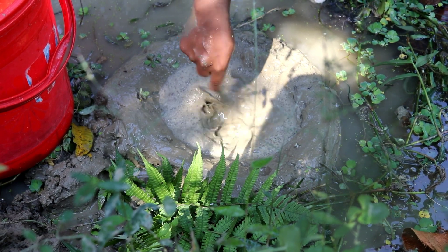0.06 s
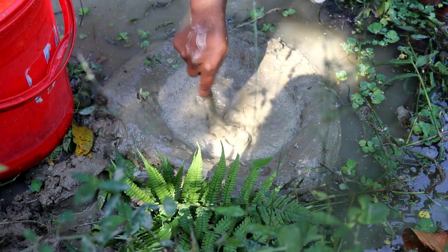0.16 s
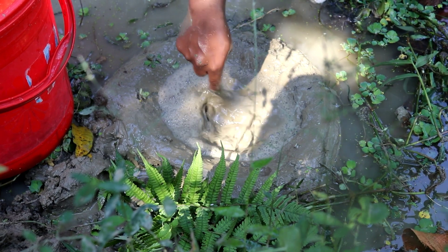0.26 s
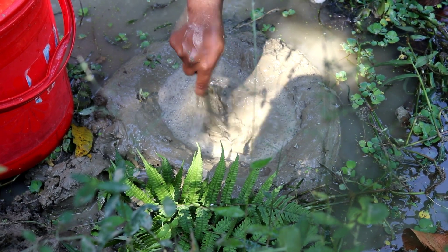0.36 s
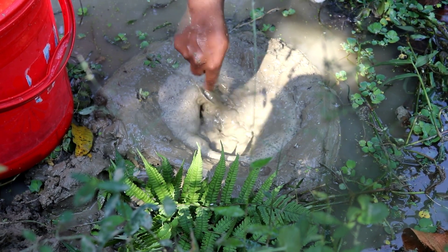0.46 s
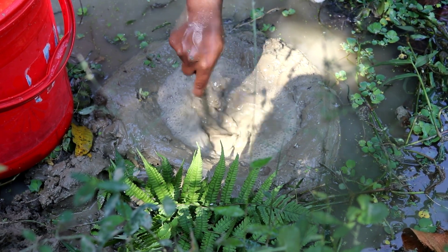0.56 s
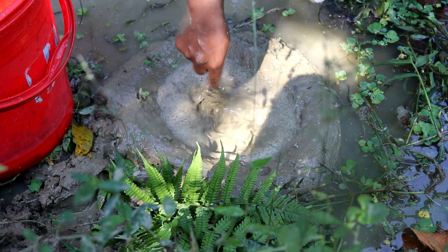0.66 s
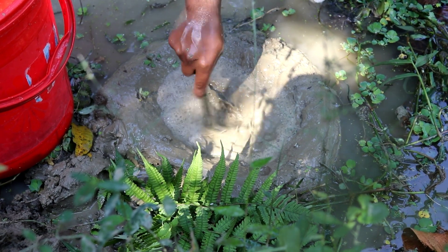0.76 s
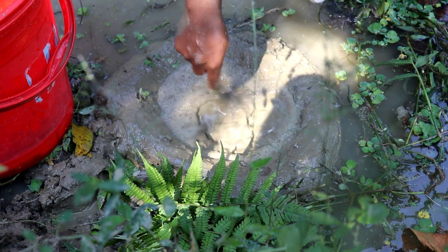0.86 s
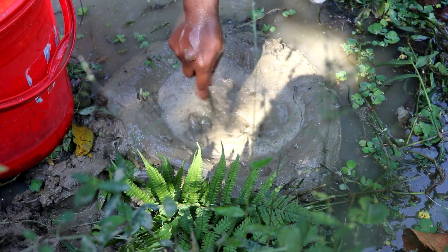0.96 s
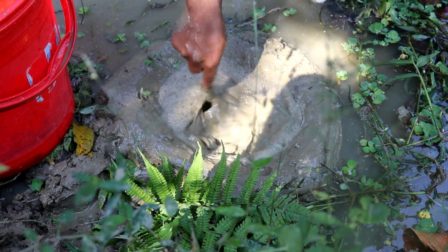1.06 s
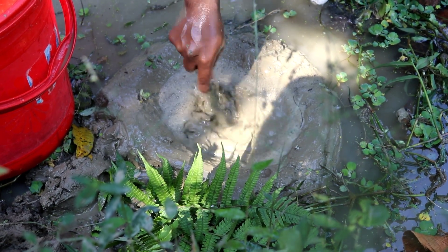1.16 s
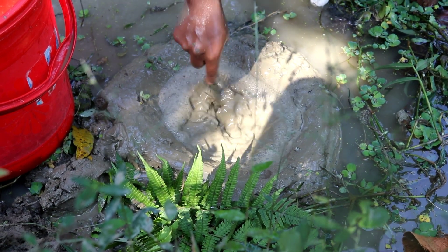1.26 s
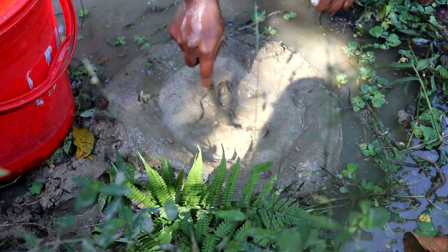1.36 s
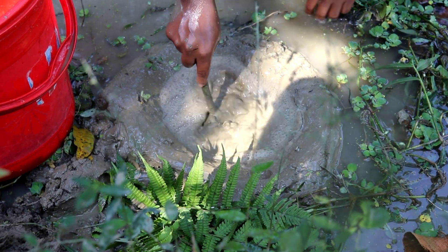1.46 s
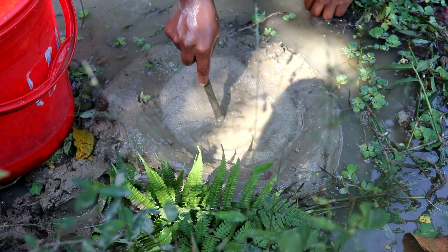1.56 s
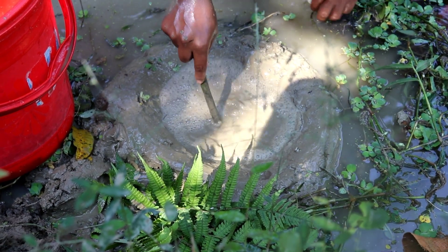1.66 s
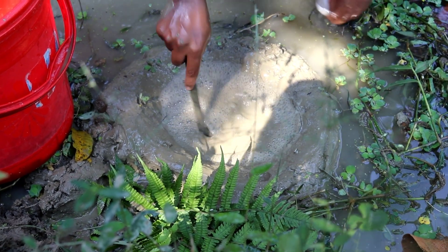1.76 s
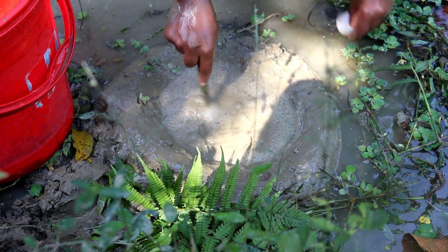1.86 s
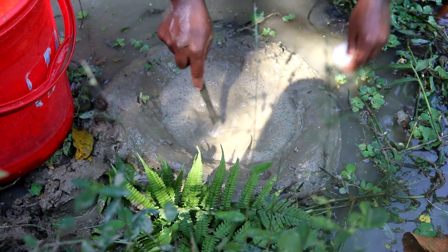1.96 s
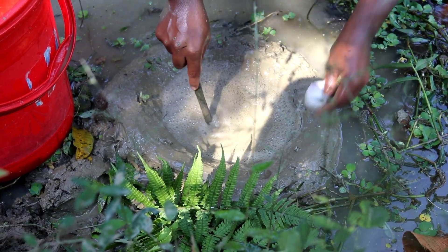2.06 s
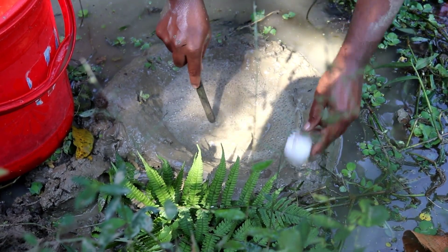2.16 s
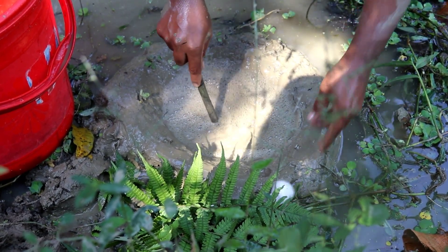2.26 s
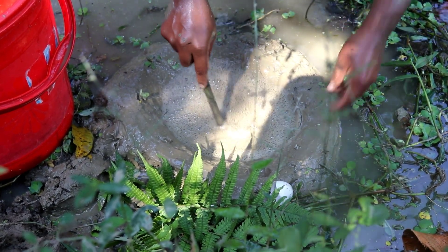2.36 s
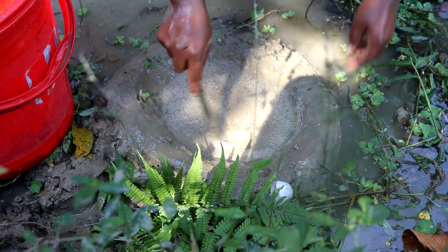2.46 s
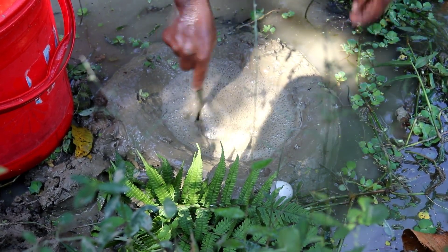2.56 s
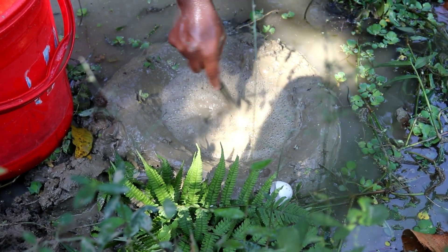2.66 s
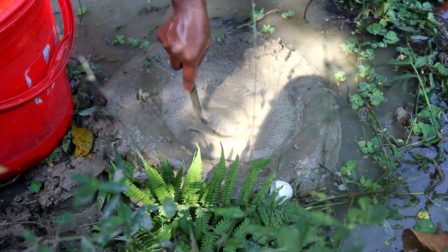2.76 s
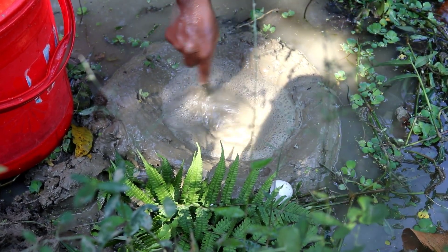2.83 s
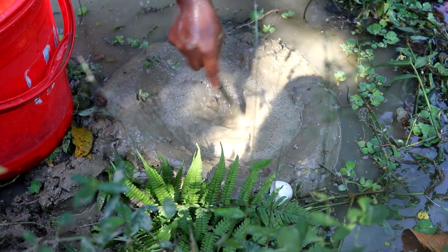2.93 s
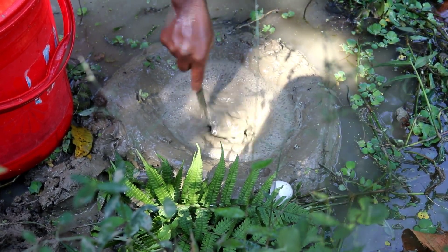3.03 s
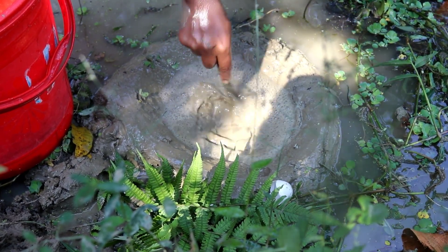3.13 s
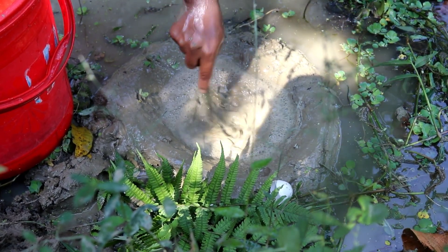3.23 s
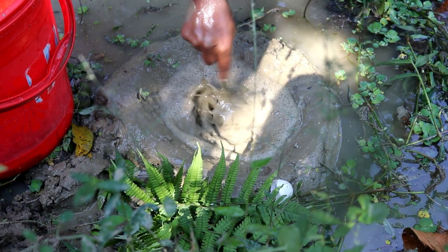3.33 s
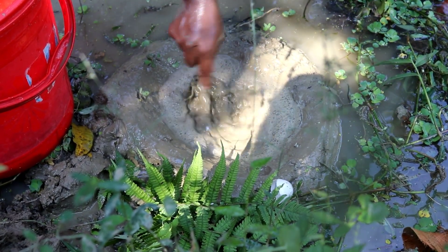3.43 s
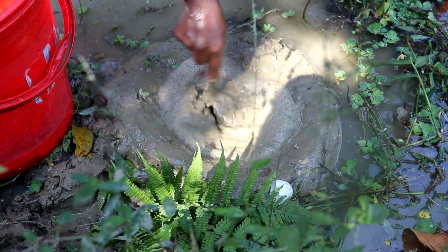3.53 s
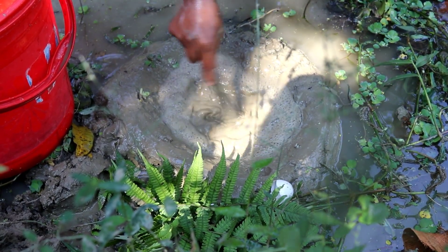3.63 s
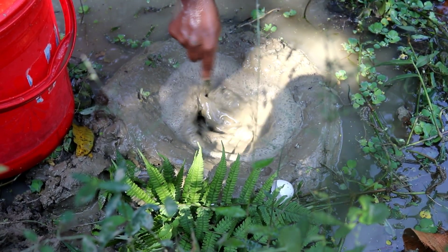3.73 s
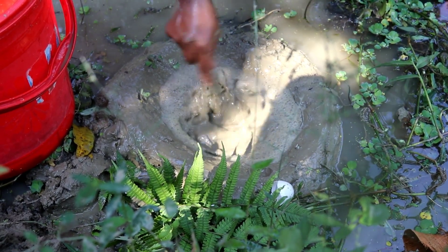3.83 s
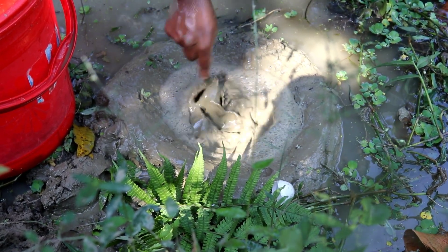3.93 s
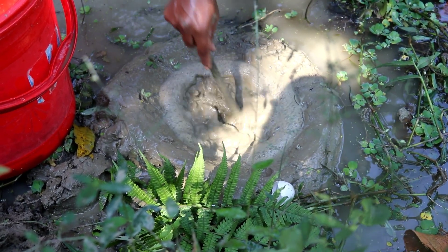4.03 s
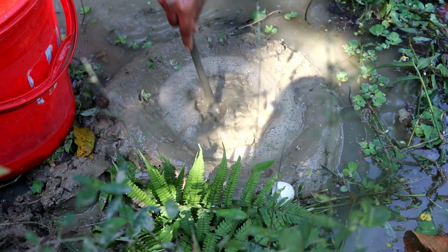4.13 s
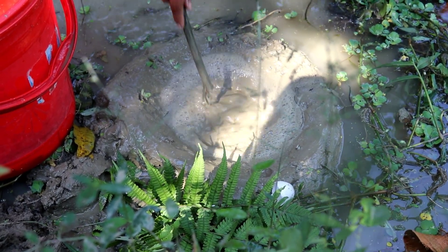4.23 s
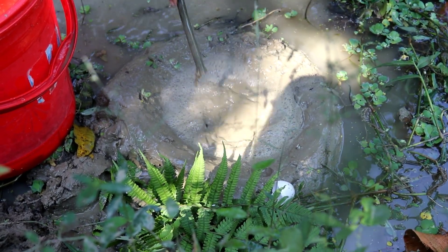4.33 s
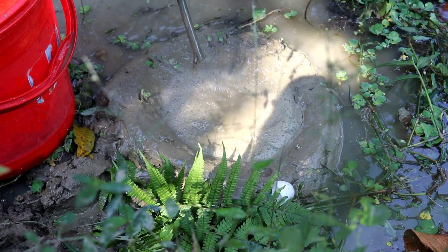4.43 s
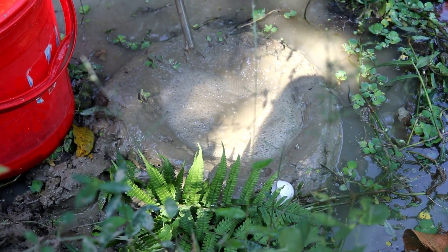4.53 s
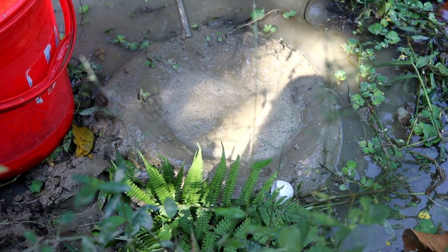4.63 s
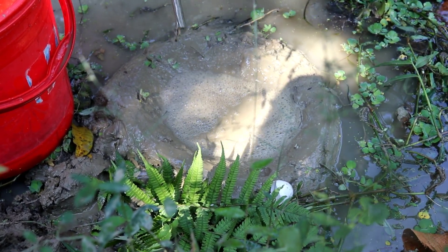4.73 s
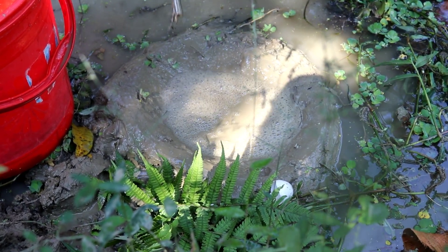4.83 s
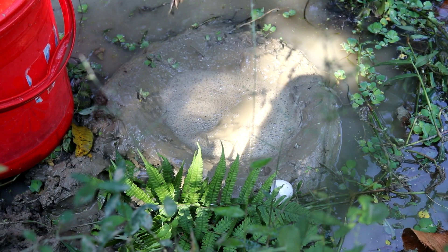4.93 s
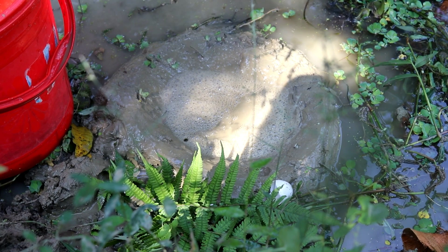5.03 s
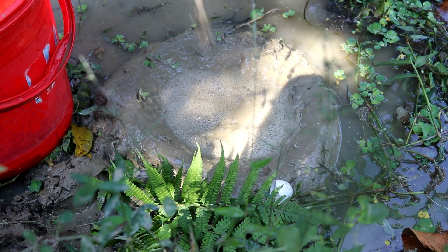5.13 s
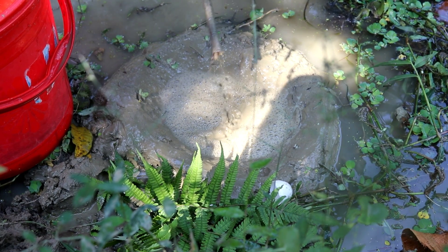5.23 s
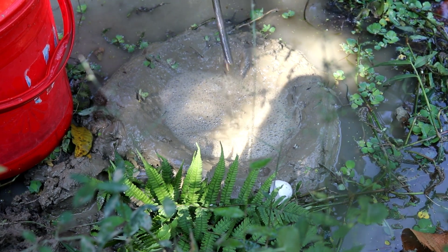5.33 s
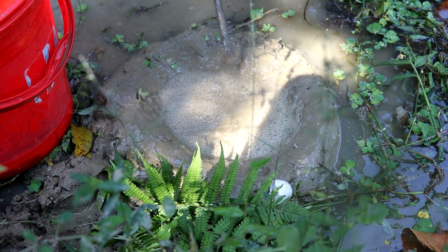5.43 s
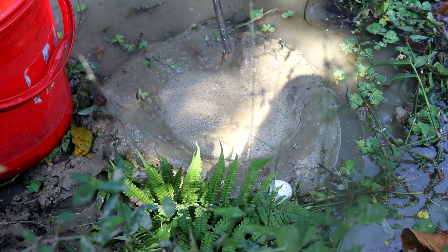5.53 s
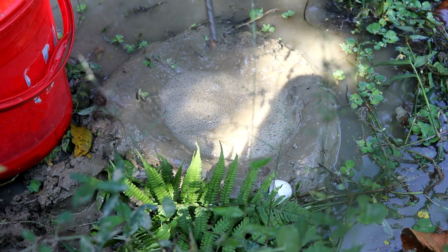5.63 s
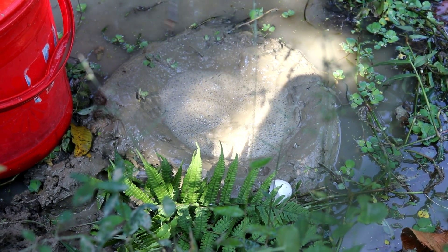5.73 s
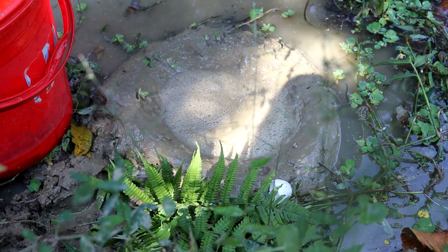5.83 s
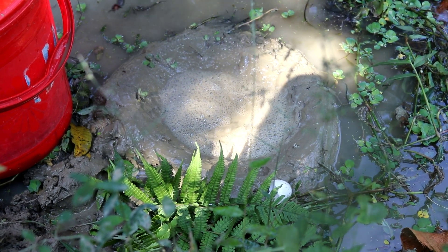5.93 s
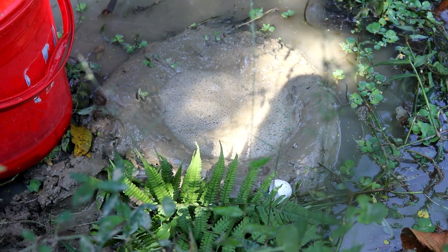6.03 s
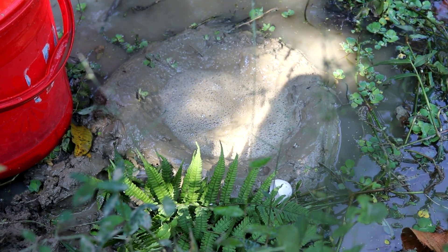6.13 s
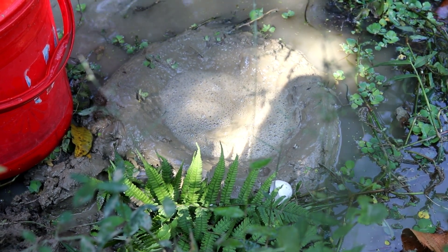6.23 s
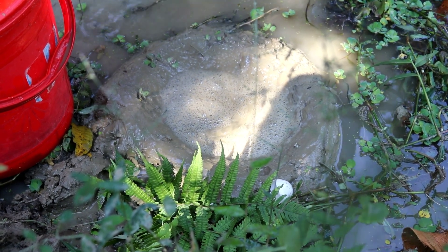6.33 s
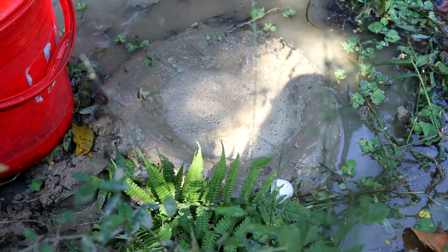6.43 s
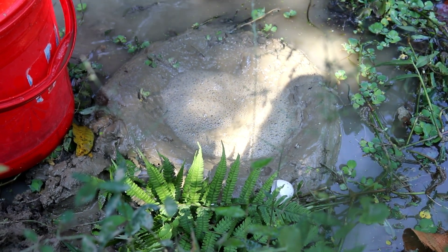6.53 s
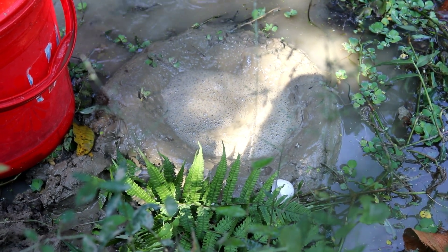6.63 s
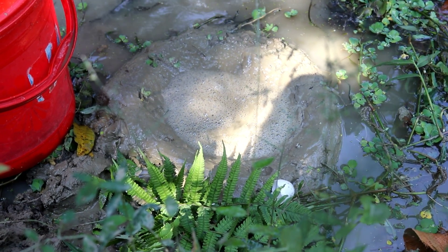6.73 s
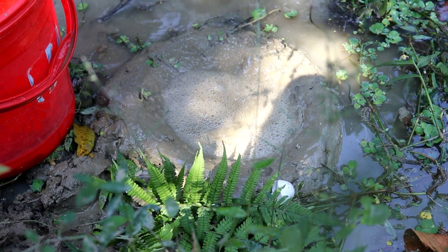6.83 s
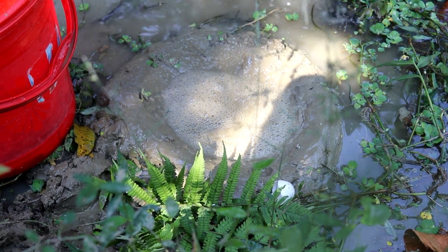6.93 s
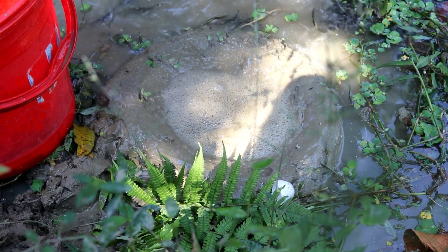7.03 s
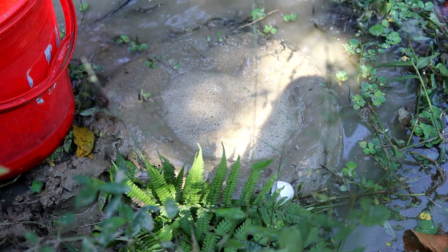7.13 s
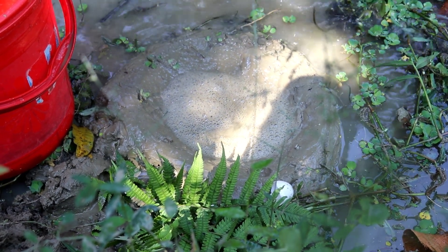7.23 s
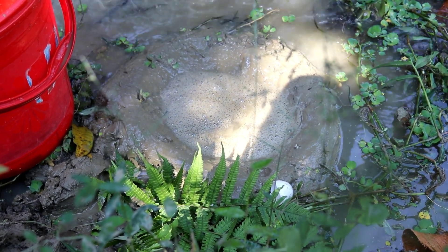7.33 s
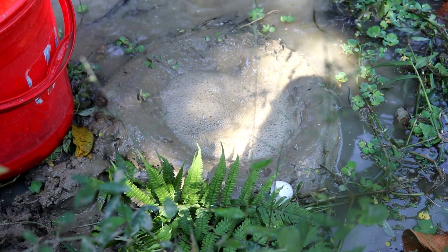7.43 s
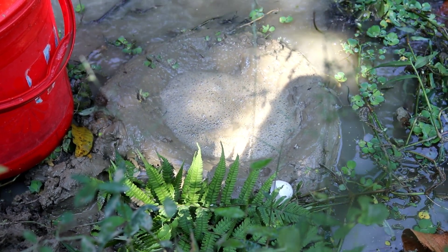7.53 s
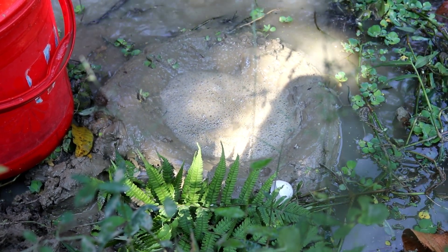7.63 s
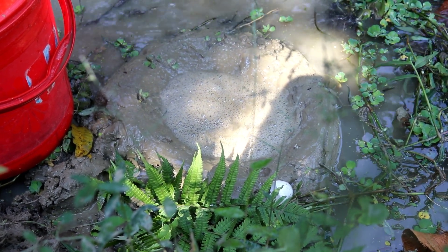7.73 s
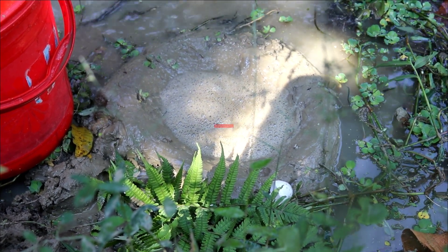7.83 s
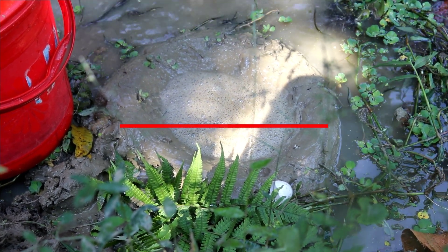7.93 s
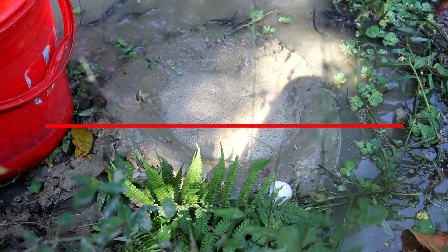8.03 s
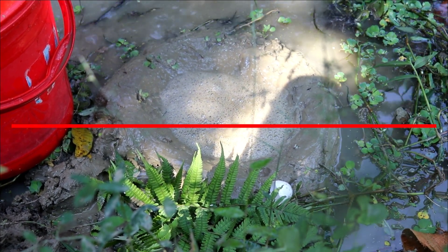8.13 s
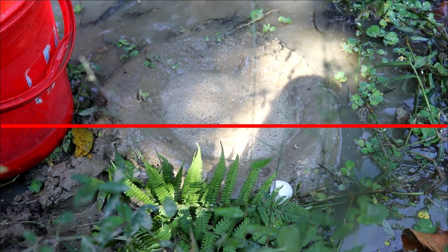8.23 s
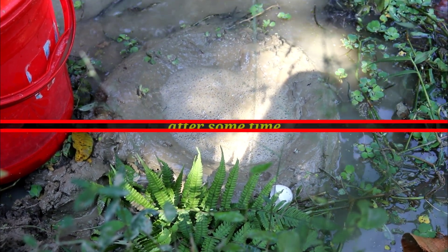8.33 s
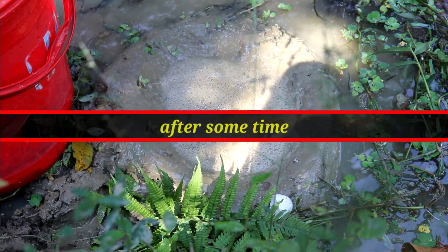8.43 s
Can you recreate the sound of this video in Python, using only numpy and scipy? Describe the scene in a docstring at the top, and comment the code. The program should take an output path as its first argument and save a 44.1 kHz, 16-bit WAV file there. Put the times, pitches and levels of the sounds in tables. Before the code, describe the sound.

From the start, a stick churns thin mud close to the microphone at a pond's edge, in quick squelching strokes with gurgles, short plops and wet splats. The stirring eases after about 1.5 seconds to a few small plops, picks up again near 2.7 seconds, is strongest between 3.5 and 4.2, and stops by 4.4. A single small splat falls at about 5.3 seconds. From 6.2 to 7.7 seconds open water sloshes lightly, with bright drips and bubbles, then settles to a few faint drops by the end near 8.5 seconds.

In the trees behind, a bird repeats quick triplets of high, falling chips from about 2.6 to 5.5 seconds, joined by faint ticks and short whistles between 4.4 and 6. Distant bird chatter, a thin, very high insect buzz and a soft rumble and hiss of outdoor air run quietly throughout.

```python
"""A stick churns thin mud in a hole at a pond's edge, close to the microphone; later, open water sloshes.
Trapped air rings as short plops over a squelch of tiny bubbles and wet splats.
Behind it an insect buzzes with a fast train of clicks, and birds chip, tick and whistle
among the trees, over a soft rumble and hiss of outdoor air."""
import sys
import numpy as np
from scipy import signal
from scipy.fft import rfft, irfft
from scipy.io import wavfile
from scipy.ndimage import uniform_filter1d

SR = 44100
rng = np.random.default_rng(int(sys.argv[2]) if len(sys.argv) > 2 else 0)


def waveform_to_disk(signal):
    """Save audio, clipped to [-1, 1], as 16-bit WAV at the path in sys.argv[1]."""
    frames = np.transpose(np.atleast_2d(signal))
    scaled = np.clip(frames, -1, 1) * 32767
    samples = np.round(scaled).astype(np.int16)
    wavfile.write(sys.argv[1], SR, samples)


N = 373968
TIME, FREQS = np.arange(N) / SR, np.fft.rfftfreq(N, 1 / SR)

# Large air pockets, close up. Each row: start in seconds, relative level in dB, pitch in Hz,
# share by which the pitch rises per ring time.
AIR_POCKETS = [(0.031, -24, 642, 0), (0.0512, -28.5, 513, 0.05), (0.0873, -28.5, 875, 0.17),
               (0.1526, -29.5, 576, 0.047), (0.2128, -20, 810, 0.064), (0.283, -27, 790, 0.096),
               (0.418, -24, 1750, 0.0052), (0.4329, -31.5, 710, 0.051), (0.539, -27, 590, 0.009),
               (0.609, -23, 660, 0.023), (0.624, -26, 1470, 0), (0.6257, -23, 556, .08),
               (0.738, -33.5, 560, 0.037), (0.8, -21.5, 1910, 0.089), (0.8126, -21, 636, 0.0036),
               (0.9077, -28.5, 910, 0.063), (1.046, -34, 303, 0), (1.092, -28.5, 730, 0),
               (1.1169, -28, 850, .03), (1.261, -28, 1950, 0), (1.2681, -36.5, 276, 0.11),
               (1.35, -25, 672, 0), (1.431, -20, 1700, 0.044), (1.6157, -30.5, 697, 0.087),
               (1.622, -41, 1326, 0.21), (1.948, -29.5, 2400, 0.0053), (1.9542, -28.5, 1920, 0.035),
               (1.98, -37, 2350, 0.11), (1.9919, -30, 645, 0.011), (2.082, -43, 616, 0),
               (2.3834, -32.5, 1770, 0.0021), (2.76, -34.5, 856, 0.058), (2.9982, -37.5, 590, 0.017),
               (3.0563, -36.5, 520, 0.068), (3.1318, -25.5, 1660, 0.025), (3.1392, -25, 1630, 0.044),
               (3.15, -33, 603, 0), (3.2314, -29, 640, 0), (3.2414, -25.5, 592, 0.064),
               (3.3057, -30.5, 2190, 0.0045), (3.4825, -26.5, 820, 0.015), (3.4832, -18.5, 3140, 0.11),
               (3.489, -17, 2030, 0.025), (3.4939, -35, 323, 0.058), (3.504, -35.5, 281, 0.078),
               (3.535, -32.5, 727, 0.42), (3.7142, -27.5, 618, 0), (3.9329, -22, 580, 0),
               (3.9363, -23, 2670, 0), (4.019, -20, 5500, .02), (4.099, -22.5, 1940, 0),
               (4.1203, -28.5, 1026, 0.11), (6.302, -48.5, 750, 0.053), (6.4012, -31, 3640, 0.036),
               (6.594, -30, 1790, 0.04), (6.606, -33, 774, 0), (6.6195, -29.5, 1180, 0.12),
               (6.696, -26, 720, 0.062), (6.704, -29, 2440, 0), (6.744, -36, 2800, .03),
               (6.795, -49.5, 460, 0.083), (6.841, -40, 1120, 0.012), (6.877, -25.5, 3820, 0.013),
               (6.908, -28.5, 3130, .22), (6.9481, -21, 1190, 0.021), (6.9557, -21.5, 3870, 0.02),
               (7.048, -36, 1700, 0), (7.131, -35.5, 1257, 0.38), (7.1347, -24.5, 2180, 0.29),
               (7.1972, -27.5, 2710, 0.064), (7.245, -32, 4330, .09), (7.3, -36.5, 3380, .1),
               (7.5068, -38.5, 2920, .15), (7.551, -37, 4230, 0.073), (7.714, -27, 2090, 0.036),
               (7.988, -39.5, 4600, 0.099), (8.247, -43, 1650, 0.019), (8.285, -49.5, 1240, 0.023)]
# The slow swell of the background. Each row: time in seconds, gain in dB.
BACKGROUND_SWELL = [(0, 7), (2.3, 4.5), (4.4, 4), (5.6, 2.5), (6.6, 4.5), (7.85, 5.5), (8.0, 1),
                    (8.48, -0.5)]


def stirring():
    """Close up, moving mud and water squeeze out a squelch, gurgles, fine spray and a hiss of mist."""
    # Four colours. Each row: frequency in Hz, gain in dB.
    squelch_colour = [(600, -9), (1100, -5), (1800, 4.5), (2400, -0.5), (3200, 3.5), (4200, -16.5),
                      (6500, -17)]
    gurgle_colour = [(120, -14.5), (300, -1.5), (430, -9.5), (600, 5.5), (720, 4.5), (820, 5.5), (1100, 0),
                     (1600, -22)]
    spray_colour = [(2500, -3), (4500, -1.5), (6500, -6), (8500, -5.5), (11000, -10.5), (15500, -22)]
    mist_colour = [(2500, -20), (5000, -2.5), (9500, -3.5), (15500, -5.5)]
    # Mist in the spray. Each row: time in seconds, gain in dB.
    mist_level = [(4.4, -1), (6.5, 0.5)]
    squelch_gain, gurgle_gain, spray_gain = flow()
    tearing = unit(uniform_filter1d(rng.standard_normal(N), 260))  # mud films tear in bursts
    squelch = froth(899, 5100, squelch_colour,
                    per_s=1500, cycles=2.33, climb=0.11, spread_db=4.5, width=0.54)
    gurgle = froth(182.7, 1181, gurgle_colour,
                   per_s=380, cycles=2.66, climb=0.1535, spread_db=1.5, width=0.038)
    spray = froth(3400, 16200, spray_colour,
                  per_s=2000, cycles=2.36, climb=0.05, spread_db=3.5, width=0.69)
    mist = amp(curve(mist_level)) * unit(tint(rng.standard_normal((2, N)), mist_colour))
    squelch *= unit(amp(2.73 * tearing))
    fizz = (amp(3) * spray + mist) * unit(amp(4.85 * tearing))
    return amp(-3) * squelch_gain * squelch + amp(-1.5) * gurgle_gain * gurgle + spray_gain * fizz


def flow(stroke_rise=0.52, deep_hz=1000):
    """Gains of squelch, gurgle and spray: the powers of churning, strokes, sloshes and wakes add up."""
    # Steady churning, in two bouts. Each row: time in seconds, relative level in dB.
    churn = [(0, -40.5), (0.7, -37.5), (1.5, -43), (1.72, -59), (2.05, -49), (2.2, -62.5), (2.66, -80),
             (2.75, -54.5), (3.35, -41), (3.65, -39), (4.15, -32.5), (4.33, -51.5), (4.45, -98)]
    # Quick sweeps of the stick. Each row: peak time and length in seconds, relative level in dB,
    # spray gain on top of that in dB.
    strokes = [(0.118, 0.11, -33, -20), (0.243, 0.083, -33, -12), (0.349, 0.083, -28, -10.5),
               (0.439, 0.088, -29.5, -17), (0.496, 0.081, -31.5, -23), (0.62, 0.13, -28, -12.5),
               (0.747, 0.25, -31.5, -12), (0.821, 0.068, -26, -15), (0.919, .12, -31.5, -24),
               (1.143, 0.24, -35.5, -10.5), (1.262, .12, -28, -10), (1.35, 0.14, -31.5, -8),
               (1.432, 0.073, -25, -11.5), (1.556, 0.16, -41.5, -5.5), (1.621, 0.032, -31, -29),
               (1.806, 0.13, -49.5, 0), (1.995, .12, -47, -11), (2.747, 0.13, -39.5, -17),
               (2.899, 0.13, -35, -18.5), (3.049, .14, -34.5, -18), (3.156, 0.12, -34, -13),
               (3.276, 0.11, -32, -15.5), (3.487, 0.061, -19, -13.5), (3.588, 0.061, -37.5, -21),
               (3.663, 0.14, -31, -14.5), (3.805, 0.036, -34, -23), (3.937, 0.055, -25, -29),
               (4.044, 0.045, -30, -21), (4.125, 0.21, -28.5, -11)]
    # Open water. Each row: peak time, rise and fall in seconds, relative level in dB,
    # spray gain on top of that in dB.
    sloshes = [(6.629, 0.052, 0.099, -33, -6), (6.706, 0.036, 0.08, -32.5, -17), (6.9, 0.14, .14, -33, -6),
               (6.965, 0.073, 0.2, -38.5, -7.5), (7.16, 0.046, 0.13, -39, 3), (7.3, 0.043, 0.14, -48, 1.5),
               (7.55, 0.17, 0.11, -41.5, -12)]
    squelch = amp(curve(churn)) ** 2
    spray = squelch * amp(-10.5) ** 2
    for s, length, db, spray_db in strokes:
        sweep = surge(s, stroke_rise * length, (1 - stroke_rise) * length, db)
        squelch += sweep
        spray += sweep * amp(spray_db) ** 2
    gurgle = squelch * amp(-9) ** 2
    for s, rise, fall, db, spray_db in sloshes:
        wave = surge(s, rise, fall, db)
        squelch += wave
        gurgle += wave * amp(-28) ** 2  # open water hardly gurgles
        spray += wave * amp(spray_db) ** 2
    # every large bubble sheds a wake of smaller ones; only the deep ones gurgle
    lead_s = .05
    wake = surge(lead_s, rise=0.0092, fall=0.034, db=0)[:SR // 4]
    for s, db, hz, _ in AIR_POCKETS:
        start = s - lead_s
        shed = wake[max(round(-start * SR), 0):]
        add(squelch, start, shed * amp(db - 14) ** 2)
        if hz < deep_hz:
            add(gurgle, start, shed * amp(db - 7.5) ** 2)
    return np.sqrt([squelch, gurgle, spray])


def surge(s, rise, fall, db, roundness=1.256):
    """Power of a push of water: up 20 dB in `rise` seconds to its peak at s, down as much in `fall`."""
    away = np.maximum((s - TIME) / max(rise, .005), (TIME - s) / max(fall, .005))
    return amp(db - 20 * np.minimum(away, 5) ** roundness) ** 2


def froth(low_hz, high_hz, colour, per_s, cycles, climb, spread_db, width, count=36):
    """A steady swarm of small bubbles of many sizes, each at its own place from left to right; rms 1."""
    out = np.zeros((2, N))
    for hz in np.geomspace(low_hz, min(high_hz, SR * .4), count):
        stretch, rise = rng.uniform([.5, 0], [1.5, climb])
        strength = amp(spread_db * np.minimum(rng.exponential(1, N // 100), 3.5))
        when, pan, luck = rng.random((3, len(strength)))
        born = luck < per_s / count * (N / SR) / len(luck)
        angle = np.pi / 4 + width * (2 * pan[born] - 1)
        births = np.zeros((2, N))
        births[:, (when[born] * N).astype(int)] = strength[born] * [np.cos(angle), np.sin(angle)]
        # small bubbles are brief, so they peak higher
        grain = bubble(hz, stretch * cycles / hz, rise, attack=1.05) * hz
        out += through(births, grain[None])
    return unit(tint(out, colour))


def bubble(hz, ring_s, rise, attack=0.62):
    """Air pinches off, rings and dies; the pitch climbs as it nears the surface."""
    age = np.arange(int(8 * ring_s * SR)) / (ring_s * SR)  # in ring times
    swing = (1 - np.exp(-(age / attack) ** 2)) * np.exp(-age)
    pitch = hz * (1 + rise * np.minimum(age, 4))
    return swing / swing.max() * np.sin(2 * np.pi * np.cumsum(pitch) / SR)


def plops(open_water_from_s=5):
    """Large air pockets ring as they close behind the stick and in the sloshing water."""
    out = np.zeros(N)
    for s, db, hz, rise in AIR_POCKETS:
        ring_s = 0.0037 * (580 / hz) ** 0.88  # smaller bubbles die sooner
        if s > open_water_from_s:
            ring_s *= 1.59  # longer in open water than in mud
        ring_s *= 1 + 3.44 * rise  # bubbles that climb in pitch ring longer
        add(out, s, amp(db) * bubble(hz, ring_s, rise))
    return amp(6.5) * out


def splats(attack_s=0.00083):
    """Mud and falling drops slap down: each a dense burst of tiny bubbles that dies within a moment."""
    # Each row: start in seconds, relative level in dB, seconds to fall by 60 dB.
    slaps = [(0.1517, -20.5, 0.025), (0.3117, -22.5, .027), (0.3374, -35, .039), (0.416, -22, .08),
             (0.6072, -15.5, 0.023), (0.81, -26, .05), (0.9074, -32.5, .039), (1.253, -26, .05),
             (1.3494, -34, 0.06), (1.4312, -13.5, 0.019), (1.8003, -29, 0.09), (1.945, -31.5, 0.036),
             (2.379, -41, .031), (2.7292, -31.5, 0.027), (3.481, -25, .04), (4.0183, -27, 0.03),
             (4.1067, -17.5, 0.032), (5.3484, -27, 0.092), (5.356, -48, .053), (5.3762, -37.5, 0.14),
             (6.218, -23, .018), (6.3363, -25, 0.023), (6.389, -40, .04), (6.3995, -24.5, 0.056),
             (6.609, -26, 0.019), (6.6342, -30, 0.02), (6.838, -27, 0.048), (6.9097, -31, .045),
             (7.1492, -20, .036), (7.198, -21.5, .021), (7.2449, -24.5, 0.031), (7.343, -31, .015),
             (7.469, -32, 0.035), (7.6792, -32, .045), (7.712, -29, .035), (7.896, -36.5, .038)]
    # Their colour. Each row: frequency in Hz, gain in dB.
    splat_colour = [(500, -12.5), (1200, -9.5), (3000, 2), (5000, 1.5), (8500, 3.5), (12000, -5),
                    (15500, -11)]
    bursts, t = np.zeros(N), np.arange(SR // 6) / SR
    onset = 1 - np.exp(-(t / attack_s) ** 2)
    for s, db, t60 in slaps:
        add(bursts, s, amp(db - 60 * t / np.clip(t60, .008, .12)) * onset)
    crackle = froth(910, 15740, splat_colour,
                    per_s=7000, cycles=3.8, climb=0.049, spread_db=2.5, width=1.0)
    return amp(-3) * bursts * crackle


def birds(chip_gap_s=.0455):
    """Back in the trees: triplets of falling chips that start softly, rising ticks and whistles."""
    # The chipping bird. Each row: time of a triplet's last chip in seconds, relative level in dB.
    triplets = [(2.63, -46.5), (2.923, -40), (3.189, -38), (3.448, -38), (3.708, -38), (3.998, -40.5),
                (4.293, -39), (4.631, -39.5), (4.927, -39.5), (5.223, -39), (5.531, -39), (5.915, -57),
                (7.871, -54), (8.349, -57.5)]
    # A small bird's ticks. Each entry: start in seconds.
    tick_times = [4.388, 4.526, 4.675, 4.848, 5.008, 5.168, 5.474]
    # Whistles. Each row: start and length in seconds, starting pitch in Hz, relative level in dB.
    whistle_notes = [(1.889, 0.035, 2560, -44.5), (2.73, 0.074, 3160, -35.5), (4.732, .066, 2856, -38),
                     (4.832, 0.078, 2385, -46.5), (5.0, 0.043, 2350, -47.5), (5.748, 0.054, 2985, -37),
                     (5.817, 0.022, 3134, -41.5), (5.853, 0.03, 2910, -38.5), (5.885, 0.035, 2400, -45.5),
                     (5.96, 0.029, 2890, -43.5)]
    # Distant bird calls heard as echo; the 7.53 s row is a soft wash of water. Rows as for the whistles.
    calls_and_wash = [(6.09, 0.13, 3950, -55.5), (6.2, 0.11, 3006, -44.5), (7.53, 0.05, 2675, -41.5),
                      (8.04, 0.1, 2660, -49.5)]
    chips, ticks = np.zeros((2, N))
    for s, db in triplets:
        for gaps_before, accent_db in ((2, -10), (1, -1.7), (0.084, 0.56)):
            chip = note(.024, start_hz=5220, end_hz=4230, waver=.007)
            add(chips, s - gaps_before * chip_gap_s - .012, amp(db + accent_db) * chip)
    for s in tick_times:
        add(ticks, s, amp(-48.5) * note(0.011, start_hz=3100, end_hz=3500))
    whistles = slurs(whistle_notes, waver=.033)
    echo_only = slurs(calls_and_wash, waver=0.19)
    chorus = chatter()
    direct = amp(2.5) * chips + amp(2) * whistles + amp(-1.5) * chorus + ticks
    # nearby leaves blur each chip; farther trees return a longer tail
    leaves = through(amp(1.5) * chips, echoes(0.15, .003, 900, 12600))
    into_trees = amp(-2.5) * chips + amp(-2) * whistles + echo_only + chorus
    return direct + leaves + through(into_trees, echoes(.6, .008, 810, 9200))


def slurs(notes, waver, fall_oct_per_s=4.2):
    """Wavering tones that all slide down at the same rate."""
    out = np.zeros(N)
    for s, length, hz, db in notes:
        end_hz = hz * 2 ** (-fall_oct_per_s * length)
        add(out, s, amp(db) * note(length, hz, end_hz, waver))
    return out


def note(length, start_hz, end_hz, waver=0.014):
    """A tone that swells and fades as its pitch glides and wavers."""
    count = int(length * SR)
    wobble = unit(uniform_filter1d(rng.standard_normal(SR // 4), 150))[:count]
    pitch = np.geomspace(start_hz, end_hz, count) * (1 + waver * wobble)
    return np.sin(np.linspace(0, np.pi, count)) * np.sin(2 * np.pi * np.cumsum(pitch) / SR)


def chatter(count=420):
    """Many distant birds, each brief note at its own time, pitch and slope; high notes carry less far."""
    out = np.zeros(N)
    calls = rng.uniform([0, .012, 1500, .68, -7], [N / SR, .04, 3500, 1.2, 2], (count, 5))
    for s, length, hz, slope, db in calls:
        add(out, s, amp(db - 57.5) * min(1, 2800 / hz) * note(length, hz, hz * slope))
    return out * amp(curve(BACKGROUND_SWELL))


def insect(pitch_hz=9080, width_hz=290, skirt=0.067):
    """An insect in the background: a fast train of noisy clicks rings a narrow, high resonance."""
    # Its loudness. Each row: time in seconds, relative level in dB.
    buzz_level = [(0, -55), (1.55, -66), (1.75, -57), (2.73, -53), (2.79, -65), (3.3, -62), (3.7, -53),
                  (4.68, -55.5), (4.72, -66), (5.5, -56), (8.48, -59)]
    # Its pace. Each row: time in seconds, clicks a second.
    click_rate = [(5.5, 125), (6.1, 129.5)]
    phase = np.cumsum(curve(click_rate)) / SR % 1
    noise = rng.standard_normal((2, N)) + 1.2 * rng.standard_normal(N)  # partly alike on both sides
    clicks = (0.28 + np.exp(-phase / 0.2)) * noise
    detune = (FREQS - pitch_hz) / width_hz
    resonance = 1 / (1 + 2j * detune) / (1 + 2j * detune * skirt) ** 2
    return amp(curve(buzz_level) - 6.5) * unit(irfft(rfft(clicks) * resonance, N))


def air():
    """Open air at the pond: a soft rumble, alike on both sides, and a wide, distant hiss."""
    # Its colour. Each row: frequency in Hz, gain in dB.
    air_colour = [(25, -25), (48, -5.5), (80, 0), (150, -1.5), (230, -6.5), (310, -4.5), (440, -13),
                  (630, -9.5), (1200, -14.5), (2000, -16), (3000, -14.5), (4200, -12.5), (6500, -21.5),
                  (9000, -13.5), (11500, -30.5), (14800, -26)]
    # Its stereo image. Each row: frequency in Hz, left-right likeness from 0 to 1.
    air_likeness = [(60, 1), (400, 0.79), (1200, 0.31), (3000, 0.054), (15000, 0.047)]
    left, independent = rfft(rng.standard_normal((2, N)))
    likeness = at_hz(air_likeness, FREQS)
    right = likeness * left + np.sqrt(1 - likeness ** 2) * independent
    return amp(-56.5) * unit(tint(irfft(np.array([left, right]), N), air_colour))


def echoes(t60, delay_s, low_hz, high_hz):
    """Scattered reflections, left and right, that die by 60 dB in t60 seconds; energy 1 a side."""
    t = np.arange(int((t60 + delay_s) * SR) + 64) / SR
    taps = rng.standard_normal((2, len(t))) * amp(-60 * t / t60) * (t > delay_s)
    taps = signal.sosfilt(signal.butter(1, [low_hz, high_hz], "band", fs=SR, output="sos"), taps)
    return taps / np.linalg.norm(taps, axis=1, keepdims=True)


def amp(db):
    """Turns dB into amplitude."""
    return 10 ** (np.asarray(db) / 20)


def unit(x):
    """Scales to rms 1."""
    return x / np.sqrt(np.mean(x ** 2) + 1e-20)


def at_hz(points, hz):
    """Reads (Hz, value) rows on a log-frequency axis."""
    f, value = np.transpose(points)
    return np.interp(np.log(hz + 1), np.log(f), value)


def curve(points):
    """Reads (seconds, value) rows at every sample."""
    return np.interp(TIME, *np.transpose(points))


def add(mix, s, sound):
    """Mixes a sound in from time s."""
    part = mix[..., max(round(s * SR), 0):][..., :sound.shape[-1]]
    part += sound[..., :part.shape[-1]]


def tint(x, points):
    """Colours a sound with (Hz, dB) rows."""
    return irfft(rfft(x) * amp(at_hz(points, FREQS)), N)


def through(x, response):
    """Convolves each channel with its response."""
    return signal.oaconvolve(np.atleast_2d(x), response, axes=1)[:, :N]


def scene():
    """Mud and water in front, bouncing off the bank and a bucket by the hole; birds and insect behind."""
    water = stirring() + plops() + splats()
    near_bounce = amp(-10) * through(water, echoes(0.053, 0.0015, 1270, 5900))
    tail = amp(-21.5) * through(water, echoes(.3, .015, 580, 10500))
    background = birds() + (air() + insect()) * amp(curve(BACKGROUND_SWELL))
    return water + near_bounce + tail + background


def record(dry, top_hz=15800):
    """The stereo microphone's two ports differ in colour, and the highest treble is cut off."""
    # The ports' balance. Each row: frequency in Hz, left minus right in dB.
    port_balance = [(200, 0), (420, .5), (750, 1.5), (1200, -0.5), (1600, 2), (2400, -4), (4400, -1),
                    (8100, -0.5), (11000, -3), (15000, -4.5)]
    port_db = np.array([[.5], [-.5]]) * at_hz(port_balance, FREQS)
    ports = irfft(rfft(dry) * amp(port_db), N)
    lowpass = signal.firwin(401, top_hz, window=("kaiser", 9), fs=SR)
    return signal.oaconvolve(ports, lowpass[None], "same")


dry = scene()
out = record(dry)
waveform_to_disk(out)
```